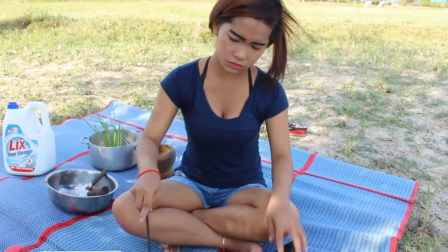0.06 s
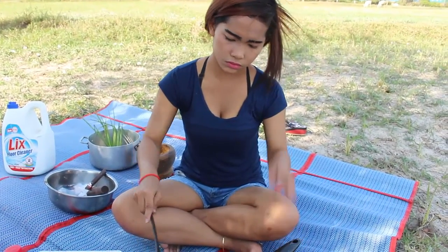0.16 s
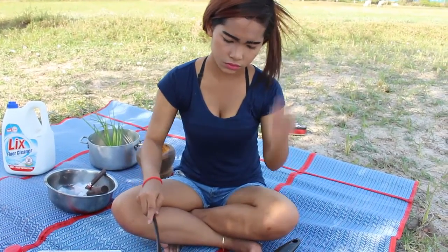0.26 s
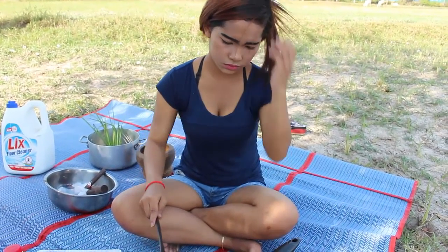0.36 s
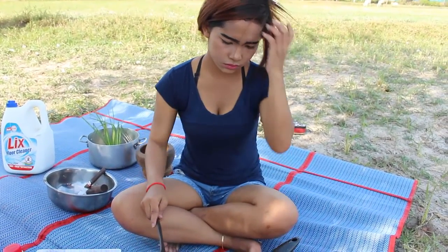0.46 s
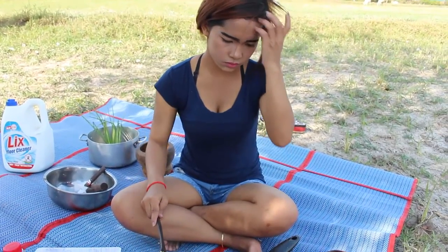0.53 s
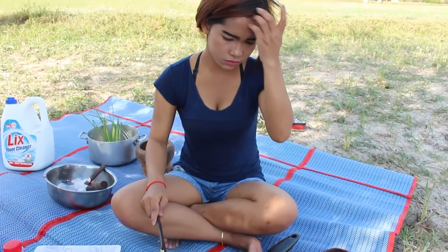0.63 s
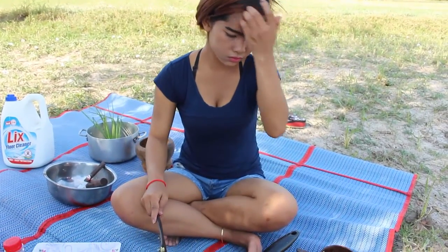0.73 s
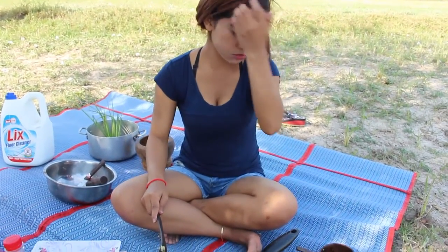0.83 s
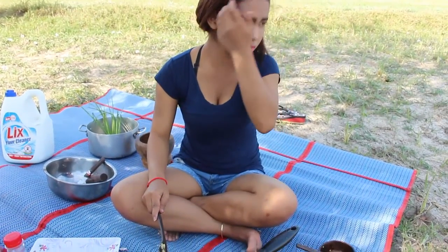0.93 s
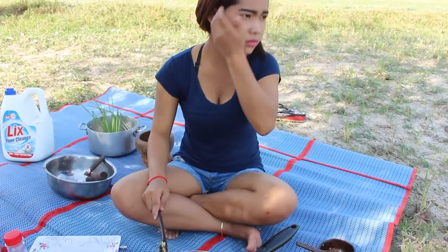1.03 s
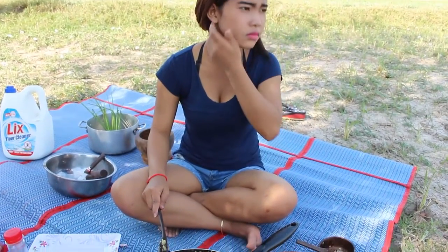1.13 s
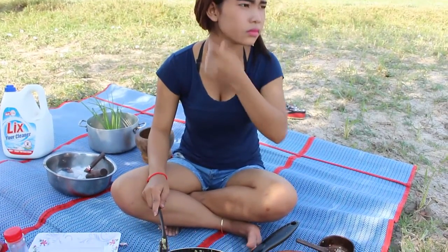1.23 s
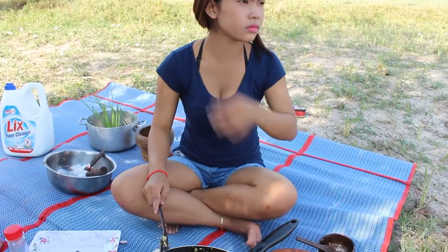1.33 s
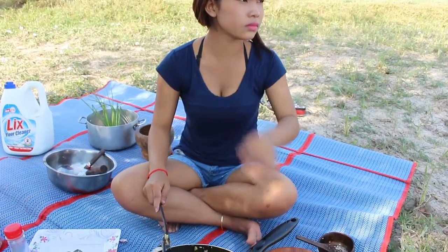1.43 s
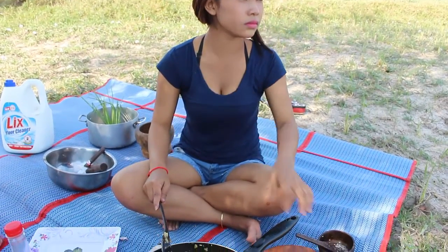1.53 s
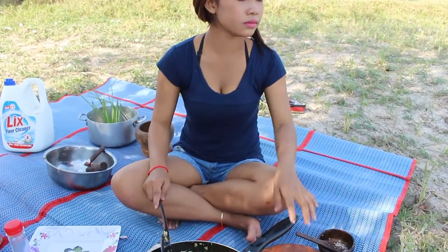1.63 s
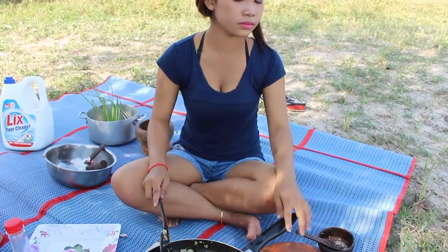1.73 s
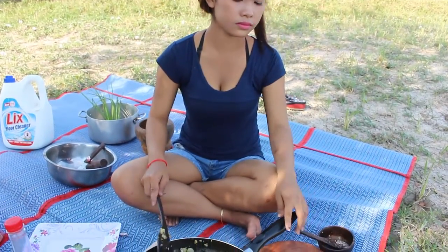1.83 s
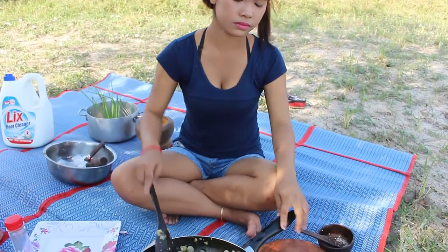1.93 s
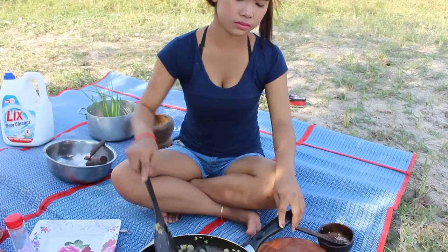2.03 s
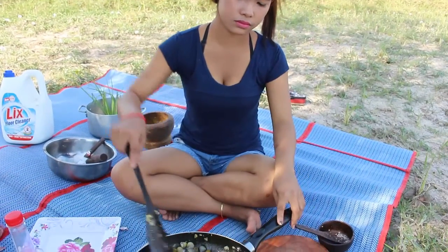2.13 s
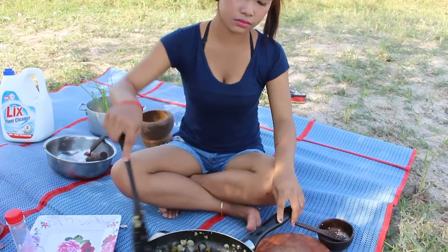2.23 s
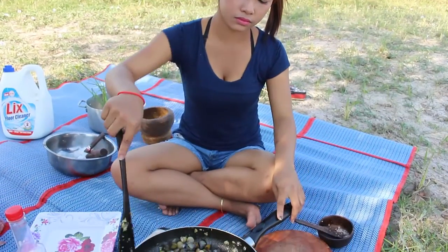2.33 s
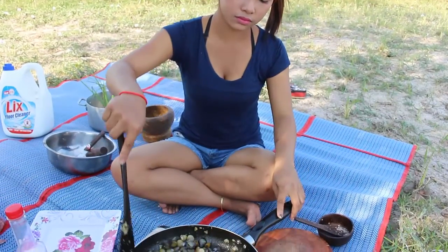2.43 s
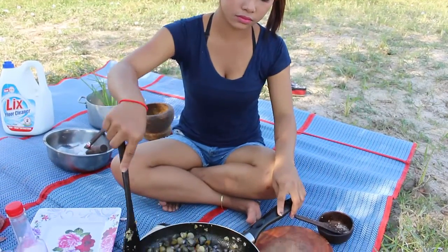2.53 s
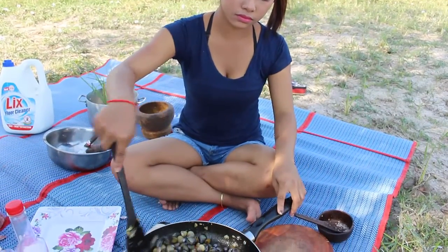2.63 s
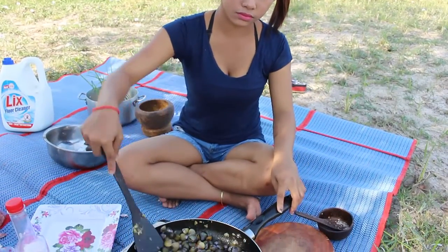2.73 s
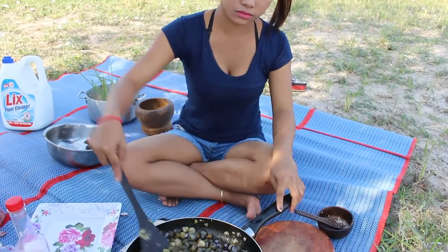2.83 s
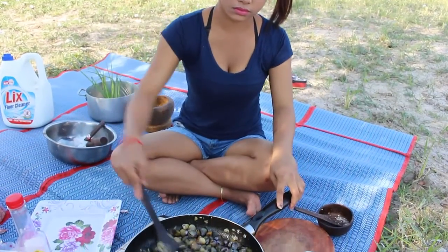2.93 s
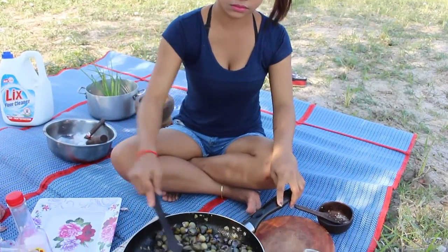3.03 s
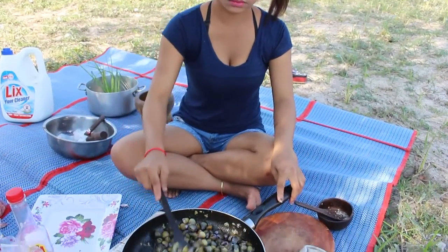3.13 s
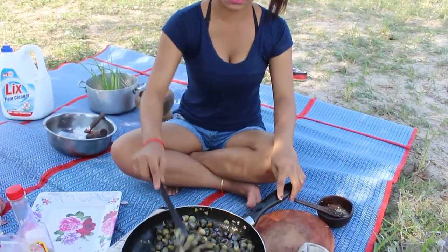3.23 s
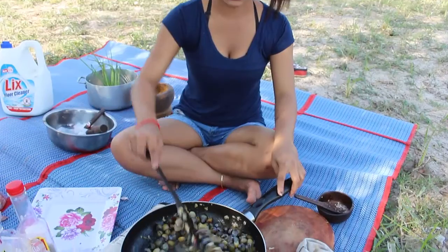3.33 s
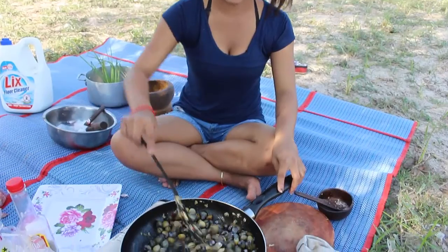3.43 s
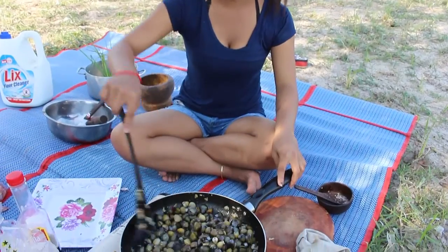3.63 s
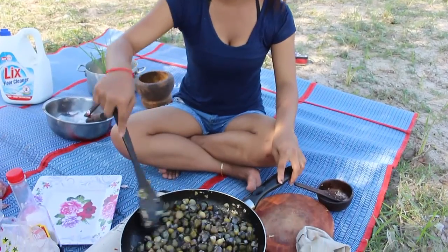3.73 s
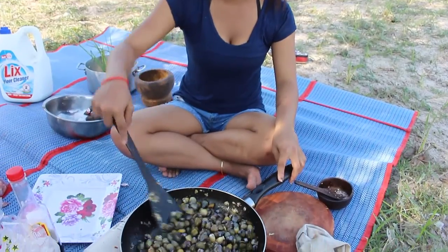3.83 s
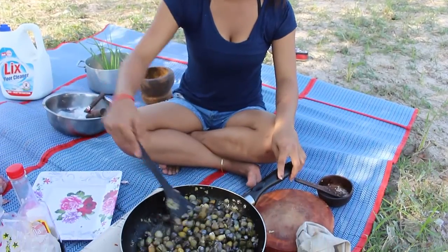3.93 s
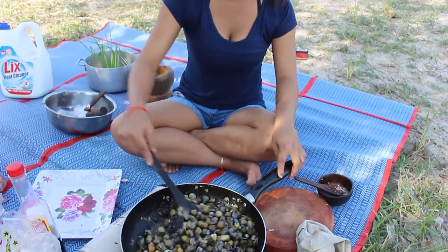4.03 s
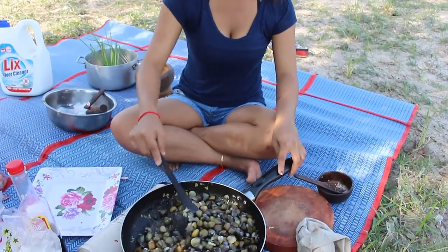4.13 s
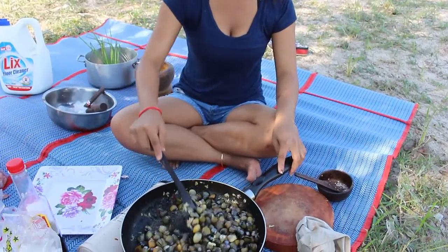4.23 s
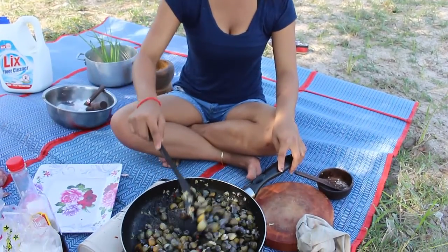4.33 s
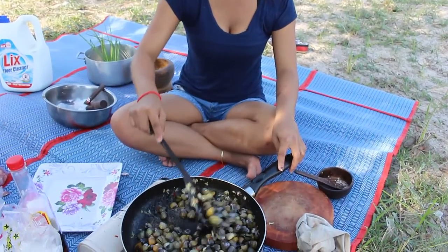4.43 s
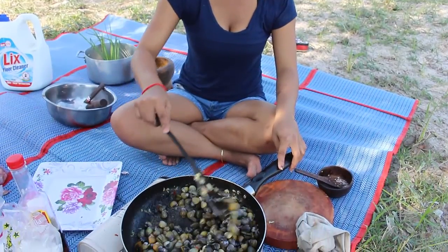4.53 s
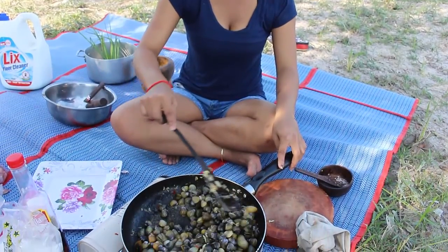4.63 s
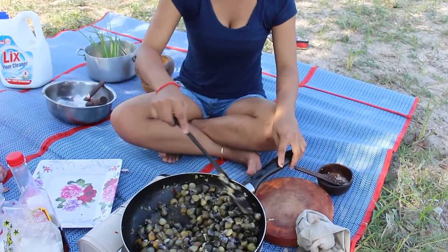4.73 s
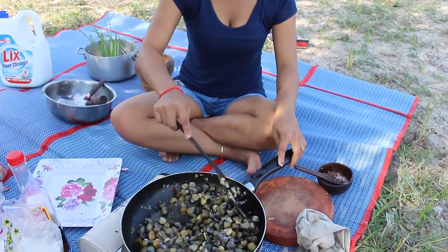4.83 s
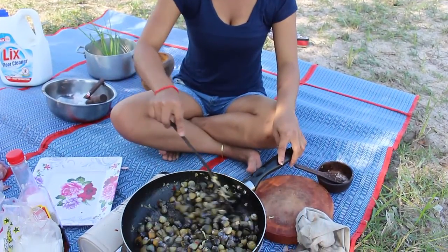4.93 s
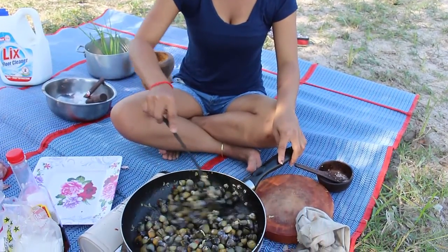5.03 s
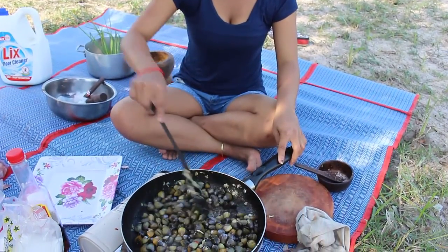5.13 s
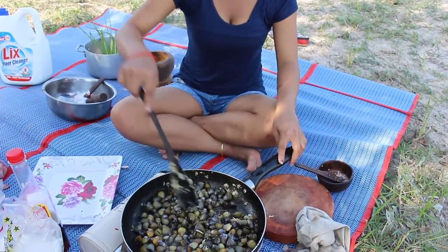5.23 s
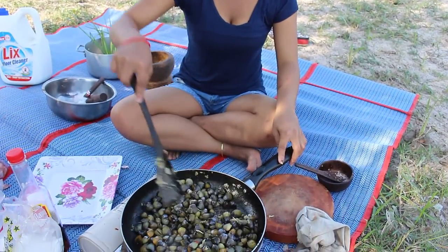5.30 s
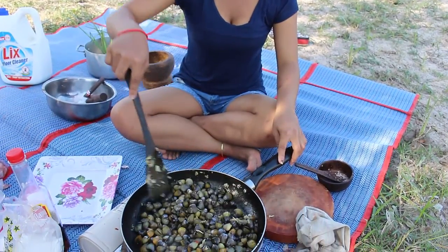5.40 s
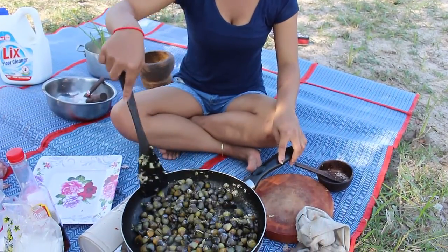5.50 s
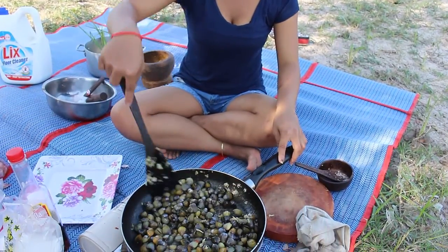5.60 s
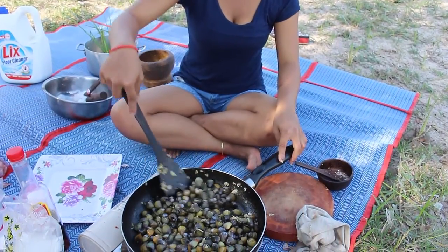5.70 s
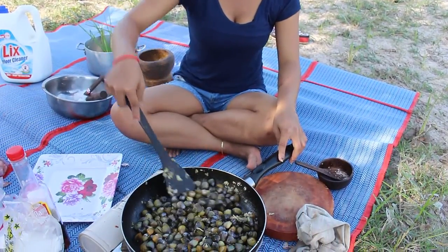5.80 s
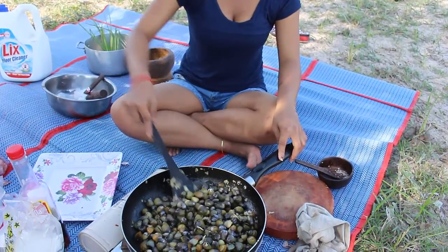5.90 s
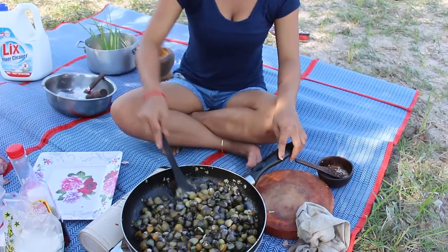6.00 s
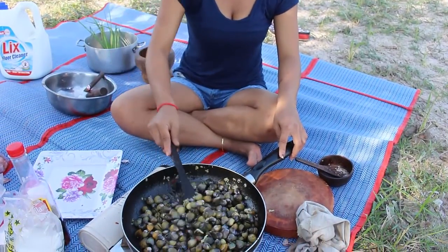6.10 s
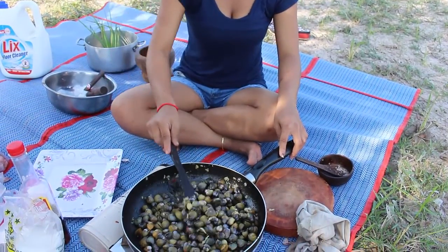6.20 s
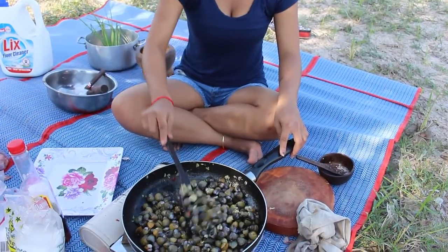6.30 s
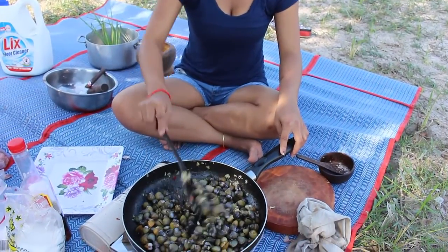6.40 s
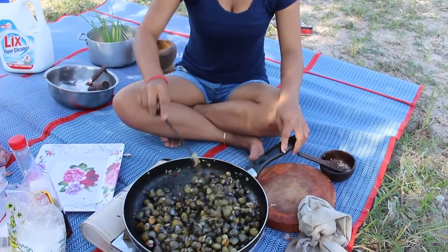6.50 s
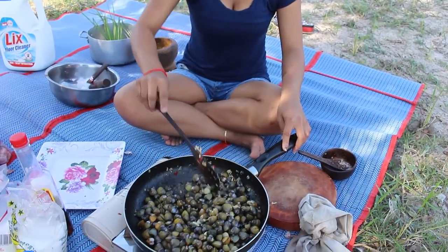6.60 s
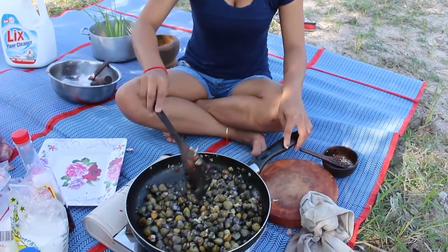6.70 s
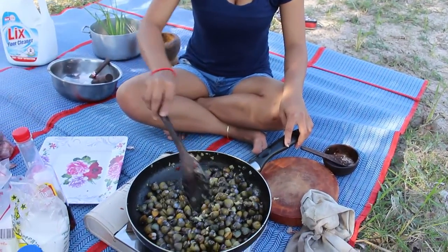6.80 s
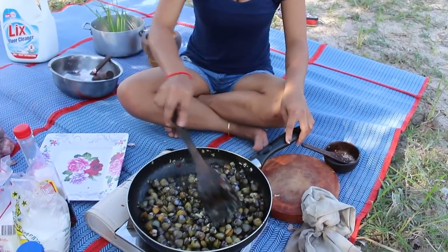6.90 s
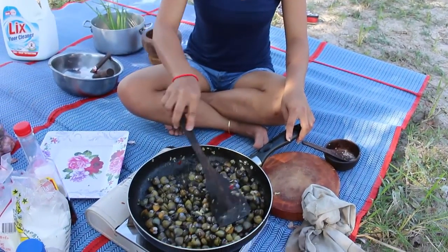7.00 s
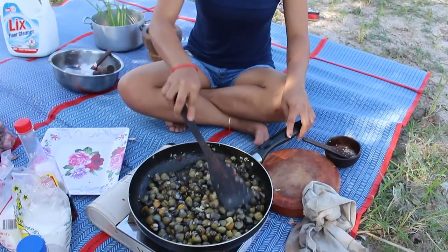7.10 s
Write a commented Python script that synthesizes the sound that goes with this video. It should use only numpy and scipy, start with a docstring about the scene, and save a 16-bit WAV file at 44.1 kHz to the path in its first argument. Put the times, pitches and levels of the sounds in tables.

```python
"""Shellfish frying in an open field

Close to a wide pan, a little left of the microphone, fat and juice hiss and spit: coloured noise and short rings.
A spatula knocks and scrapes the pan's ringing modes; shells drop back as thuds, clacks and notes, and tumble
as clumps of tiny clicks. The stand thumps softly, low noise makes the wind, and a gliding sine is a far bird.
"""
import sys
import numpy as np
from scipy import signal
from scipy.fft import rfft, irfft
from scipy.io import wavfile

SR = 44100
rng = np.random.default_rng(int(sys.argv[2]) if len(sys.argv) > 2 else 0)


def dump_mix(stems):
    """Bounce the given channels to the path in sys.argv[1] as a 16-bit WAV at rate SR."""
    frames = np.atleast_2d(stems).T  # one column per channel
    limited = np.clip(frames, -1, 1)  # hard clip at full scale
    pcm = np.round(limited * 32767).astype(np.int16)
    wavfile.write(sys.argv[1], SR, pcm)


N = 315315   # samples

# the frying bed, close by: (time [s], sizzle level [dB], gain of its treble [dB])
FRYING = [(0.0, -44, -5.5), (2.39, -42.5, -5.5), (2.81, -40.5, -5), (5.1, -42.5, -15), (5.2, -44, -2),
          (7.15, -42.5, -6.5)]
# louder spits of fat: (time [s], level [dB], pitch [Hz])
SPITS = [(0.229, -40, 2700), (0.242, -37, 2630), (0.252, -41, 2700), (0.258, -36, 2720), (0.265, -34, 2620),
         (0.9117, -30, 2520), (0.971, -37, 3500), (1.0062, -32, 4270), (1.037, -34, 3400),
         (1.075, -38, 3200), (1.108, -39, 2700), (1.645, -36, 2320), (1.96, -36, 4100), (2.194, -35, 3150)]
# relative spectrum of the frying: (frequency [Hz], level per Hz [dB])
SIZZLE_SPECTRUM = [(180, -56), (300, -10.5), (444, -11), (541, -2), (850, -8.5), (1080, -2), (1500, -5),
                   (2000, -4.5), (2600, -1.5), (3400, -0.5), (5000, -5), (12700, -15.5), (15000, -34)]
TREBLE_HZ = 6700
SPIT_CYCLES = 24.0   # cycles of the main note in which a spit falls 60 dB
SPIT_OVERTONE, SPIT_OVERTONE_DB = 1.33, 0   # pitch ratio and level over the main note


def sizzle():
    """Bursting steam bubbles: a dense hiss, a crackle of single pops, and the louder spits."""
    fry_db, treble_db = in_time(FRYING)
    hiss = rms_one(widen(*rng.standard_normal((2, N)))) * from_db(1.0 * drift(25.0))
    pops_per_s = 2500 * from_db(1.9 * drift(9.7))
    pops = rms_one(grains(pops_per_s, 2.9, 11.7, 916, 9570, scatter=0.74))
    bed = from_db(fry_db) * rms_one(colour(hiss + from_db(-4.5) * pops, SIZZLE_SPECTRUM))
    dull = signal.sosfilt(signal.butter(1, TREBLE_HZ, fs=SR, output="sos"), bed)
    sound = bed + (from_db(treble_db) - 1) * (bed - dull)
    for s, db, hz in SPITS:
        for ratio, extra_db in [(1, 0), (SPIT_OVERTONE, SPIT_OVERTONE_DB)]:
            sound = sound + ring(clicks_at([s], from_db(db + extra_db)), ratio * hz, SPIT_CYCLES / hz)
    return sound


# spatula edge on the pan: (time [s], level [dB], hardness [dB, per octave in the modes])
KNOCKS = [(0.393, -24, 1.5), (0.409, -31, -27), (2.491, -28.5, -13), (2.709, -35.5, 6.5),
          (3.7214, -14.5, -6), (4.82, -46.5, 10), (4.834, -22.5, -13), (5.5439, -21, 1), (5.554, -23, -1.5),
          (5.566, -30, -12)]
# modes of the pan, damped by the food: (frequency [Hz], relative level [dB], t60 [s])
PAN_MODES = [(430, 0.5, 0.02), (486.5, 5, 0.11), (590, 15.5, 0.034), (992, -28, 0.14), (1130, 14, 0.0096),
             (1250, -13.5, 0.12), (1607, 10, 0.041), (1923, 7, 0.046), (2085, 8.5, 0.054), (2240, 7, 0.048),
             (2767, 4.5, 0.021), (3500, 3, 0.031), (8060, -11, 0.017)]
PAN_CUT_HZ = 392   # small bodies radiate little below their first mode
EDGE_HZ, EDGE_T60_S = 2600, 0.002   # the click of the blade's edge
EDGE_DB, EDGE_FOLLOWS = 4, 1.5   # its level over the knock, and share of the knock's hardness


def pan(falls):
    """Knocks and falling shells drive the same modes, with new strengths for each knock."""
    s, db, hard_db = np.transpose(KNOCKS)
    luck_db = rng.normal(0, 2.5, (len(s), len(PAN_MODES)))
    knocks = 0
    for k, (hz, level_db, t60) in enumerate(PAN_MODES):
        # a harder knock favours the higher modes; neighbouring modes swing in opposite phase
        sign = (-1) ** k
        size = sign * from_db(db + level_db - 19.0 + luck_db[:, k] + hard_db * np.log2(hz / 500))
        fall_push = sign * from_db(level_db - 32.0) * falls
        knocks = knocks + ring(clicks_at(s, size) + fall_push, hz, t60)
    # the edge itself clicks and cracks: a few milliseconds of noise
    crack = burst(clicks_at(s, from_db(db - 1.5)), 0.0032, 1500, 5000)
    crack += ring(clicks_at(s, from_db(db + EDGE_DB + EDGE_FOLLOWS * hard_db)), EDGE_HZ, EDGE_T60_S)
    # and the food shakes for a moment after, duller
    crack += burst(clicks_at(s, from_db(db - 1.5)), 0.012, 320, 2600)
    return high_pass(knocks + crack, PAN_CUT_HZ)


# shells dropping on the metal: (time [s], thud level [dB], clack over thud [dB], own note [Hz])
DROPS = [(2.6965, -40, 15.5, 2060), (2.7635, -32, 2, 1880), (2.8625, -26, 1, 1770),
         (2.9304, -26.5, -3, 2840), (2.97, -22, 3, 4540), (2.9882, -29, 10, 5280),
         (3.041, -15.5, -16, 1580), (3.0825, -27, 1.5, 1710), (3.1292, -22, -1, 4260),
         (3.2773, -29, 9, 4760), (3.3174, -18, 3, 2100), (3.405, -17, 3.5, 3250), (3.4335, -25, -4, 1580),
         (3.47, -16, -1, 4930), (3.4843, -24.5, -6, 1550), (3.5625, -21, 3, 5000), (3.5884, -19, 8.5, 3700),
         (3.627, -23.5, -5, 3600), (3.6692, -33, 7.5, 4820), (3.769, -31, 12, 2280),
         (3.8125, -33, 17, 3600), (3.8387, -35.5, 16, 3140), (3.856, -28.5, 7, 5770), (3.877, -52, 6, 5920),
         (3.9268, -29, 2, 2000), (3.9494, -29.5, 10, 3400), (4.0168, -20, -23, 1400),
         (4.0313, -16, -13, 1940), (4.036, -25, -20, 1650), (4.0633, -22.5, -12, 1850),
         (4.0875, -24, -11, 1570), (4.0978, -23, -4, 1710), (4.1092, -22, 3.5, 1540),
         (4.186, -37, 13, 5960), (4.1939, -25, -4, 3000), (4.2329, -16, -13, 1460), (4.24, -17, 2, 1570),
         (4.2514, -16.5, -0.5, 3430), (4.2612, -28, 2, 3280), (4.3033, -24.5, -1, 2180),
         (4.3432, -23, -12, 2160), (4.3547, -14, -4, 2090), (4.3966, -27.5, 7, 2940),
         (4.4228, -25, 2, 4730), (4.4346, -25, -4, 2240), (4.52, -29, 10, 2710), (4.5354, -23.5, 0, 2020),
         (4.574, -18, 6, 2290), (4.6323, -40.5, 20.5, 6890), (4.6845, -38, 14, 8000),
         (4.7134, -33.5, 21, 7480), (4.766, -29, 8, 1960), (5.138, -26, 7, 1520), (5.5068, -49, 23.5, 4150),
         (5.7715, -33.5, 11, 1970), (5.893, -27, -2, 1430), (5.999, -29.5, 4, 2570),
         (6.0588, -26.5, 6.5, 2000), (6.088, -24.5, 0, 3200), (6.121, -16, 1, 2050), (6.1486, -15, 0, 2560),
         (6.2145, -23, 0, 4300), (6.222, -18.5, 4, 4360), (6.229, -22, -6, 3480), (6.243, -22, -20, 1730),
         (6.271, -26, -23, 1600), (6.2761, -19.5, -14, 1560), (6.2976, -26, 0, 2600),
         (6.305, -17.5, -14, 1600), (6.3096, -22.5, -1.5, 1470), (6.3354, -20.5, -4, 2140),
         (6.3645, -24, -1, 5010), (6.3952, -23, -4, 2060), (6.435, -26, -16, 2020), (6.444, -27, -16, 1490),
         (6.4753, -23.5, 4, 2000), (6.496, -24, -2, 2000), (6.5334, -23, 4, 2010), (6.6271, -27.5, 0, 3410),
         (6.662, -41, 15, 4070), (6.953, -33.5, 11, 7650), (7.038, -38, 18.5, 2480),
         (7.111, -31, 7.5, 2250)]
# a shell's clack: (frequency [Hz], t60 [s])
SHELL_MODES = [(2100, 0.0017), (2900, 0.0041), (4200, 0.0022)]
SHELL_CUT_HZ = 385
THUD_HZ, THUD_RISE_S = 1200, 0.00042   # middle pitch; the soft contact swells for about half a cycle
OWN_DB, OWN_FOLLOWS = -5.5, 0.54   # own note: level over the thud, and share of the clack's brightness
OWN_CYCLES = 30   # cycles in which the note falls 60 dB
TICK_DB, TICK_FOLLOWS = -7, 1   # rim's tick: level over the thud, and share of the clack's brightness
HEAVY_DB, TICK_LOSS = -25, 0.18   # heavier falls land on the body: dB of tick lost per dB of thud


def drops():
    """Each shell thuds softly, clacks, clacks again as it bounces and rings its own note; its rim ticks brightly."""
    s, db, clack_db, own_hz = np.transpose(DROPS)
    mode_luck = rng.normal(0, 1, (len(s), len(SHELL_MODES)))
    gap_luck = rng.normal(0, 1, len(s))
    pitch_luck = rng.normal(0, 1, (len(s), 1))
    bounce_s = s + 0.002 * from_db(5 * gap_luck)
    out = 0
    for k, (hz, t60) in enumerate(SHELL_MODES):
        size = -(-1) ** k * from_db(db + clack_db - 3 + 1.5 * mode_luck[:, k])
        second = clicks_at(bounce_s, size * from_db(-9))
        out = out + ring(clicks_at(s, size) - second, hz, t60)

    t = np.arange(SR // 40) / SR
    swell = t / THUD_RISE_S * np.exp(1 - t / THUD_RISE_S)
    thud_hz = THUD_HZ * from_db(1.1 * pitch_luck)
    thuds = from_db(db[:, None]) * swell * np.sin(2 * np.pi * thud_hz * t)
    own_db = db + OWN_DB + OWN_FOLLOWS * clack_db
    note_fade = from_db(own_db[:, None] - 60 * t * own_hz[:, None] / OWN_CYCLES)
    notes = note_fade * np.sin(2 * np.pi * own_hz[:, None] * t) * np.minimum(t / THUD_RISE_S, 1)
    places = np.round(s * SR).astype(int)[:, None] + np.arange(len(t))
    np.add.at(out, places, -thuds - notes)

    # a short rattle
    out += burst(clicks_at(s, from_db(db - 7.5)), 0.0048, 650, 3100)
    tick_db = db + TICK_DB + TICK_FOLLOWS * clack_db - TICK_LOSS * (db - HEAVY_DB)
    ticks = burst(clicks_at(s, from_db(tick_db)), 0.0023, 5100, 9470)
    # treble is placed less to the left than the thud
    shells = high_pass(out, SHELL_CUT_HZ) + ticks * from_db([[-.8], [.8]])
    return shells, clicks_at(s, from_db(db))


# the blade slides on the pan: (start [s], length [s], rasp level [dB], drone level [dB], drone pitch [Hz],
# share of slips locked to the mode [0-1])
SCRAPES = [(2.507, 0.15, -55, -53, 483, 0.15), (2.677, 0.018, -53, -40.5, 495, 0.37),
           (2.691, 0.045, -39, -46, 537, .3), (2.738, 0.17, -45.5, -49, 523, 0.35),
           (3.006, 0.054, -51, -41.5, 616, 0.42), (3.077, 0.21, -55, -49.5, 576, .3),
           (3.802, 0.05, -37.5, -33, 531, 0.43), (3.893, 0.37, -50.5, -49, 583, 0.38),
           (4.832, 0.14, -52.5, -47, 495, 0.38), (4.965, 0.21, -47, -50, 539, .2),
           (5.633, 0.11, -43, -40, 563, 0.6), (6.008, 0.32, -61, -49.5, 593, .3)]
SCRAPE_ATTACK_S, SCRAPE_RELEASE_S = 0.057, 0.065
SCRAPE_GROWTH_DB = -6   # a scrape weakens while it lasts
RASP_CUT_HZ, DRONE_T60_S = 1860, 0.024
DRONE_WAVER = 0.03   # share by which the drone's pitch wavers
RUMBLE_DB = -21   # the stand's shaking, relative to the drone's level


def sliding():
    """Chatter rasps in the upper modes and drones low, at a pitch set by the load; it shakes the stand."""
    s, length, rasp_db, drone_db, drone_hz, steady = np.transpose(SCRAPES)
    shape = SCRAPE_ATTACK_S, SCRAPE_RELEASE_S, SCRAPE_GROWTH_DB
    chatter = random_clicks(4000 * from_db(3.3 * drift(25)), 2.6)
    rasp = 0
    for k, (hz, db, t60) in enumerate(PAN_MODES):
        rasp = rasp + (-1) ** k * from_db(db - 2.8 * np.log2(hz / 500)) * ring(chatter, hz, t60)
    out = strokes(s, length, rasp_db, *shape) * rms_one(high_pass(rasp, RASP_CUT_HZ))
    warped_s = np.cumsum(1 + DRONE_WAVER * drift(24.0)) / SR
    for k, hz in enumerate(drone_hz):
        locked = np.sqrt(2) * np.sin(2 * np.pi * hz * warped_s)
        loose = rms_one(ring(chatter, hz, DRONE_T60_S))
        drone = steady[k] * locked + (1 - steady[k]) * loose
        out += strokes(s[[k]], length[[k]], drone_db[[k]], *shape) * drone
    rumble = rms_one(ring(rng.standard_normal(N), *STAND_MODES[1]))
    return out + from_db(RUMBLE_DB) * strokes(s, length, drone_db, *shape) * rumble


# heaps of shells shoved along: (start [s], length [s], whole shells' level [dB], shell rims' level [dB])
SHOVES = [(2.474, 0.08, -54, -53), (2.686, 0.018, -49, -39.5), (2.844, 0.044, -41, -46.5),
          (2.926, 0.12, -36.5, -45.5), (3.104, 0.27, -48, -48), (3.429, 0.063, -44, -36.5),
          (3.546, 0.014, -57, -47), (3.79, 0.1, -62, -39), (3.887, 0.22, -38, -47),
          (4.417, 0.18, -43.5, -43), (4.631, 0.12, -44.5, -44), (4.834, 0.12, -43, -48.5),
          (5.011, 0.14, -37.5, -42.5), (5.173, 0.037, -40, -53), (5.626, 0.17, -41.5, -44),
          (5.79, 0.29, -42, -48), (6.02, 0.25, -44.5, -56), (6.4, 0.22, -43.5, -42),
          (6.753, 0.41, -52, -70), (6.99, 0.13, -42.5, -51.5)]
# relative spectrum given to the tumbling shells: (frequency [Hz], level per Hz [dB])
TUMBLE_SPECTRUM = [(290, -35), (500, 8.5), (839, -4.5), (1150, 5), (1600, 3.5), (2200, 3.5), (3000, -0.5),
                   (4200, -5), (7700, -4), (13200, -18.5), (15500, -18)]
SHOVE_ATTACK_S, SHOVE_RELEASE_S = 0.065, 0.12
WHOLE_GROWTH_DB, RIM_GROWTH_DB = 2.5, 3.5   # the heap swells as the blade gathers it


def tumble():
    """Shells pushed along rub and click on each other in clumps: dull for whole shells, bright for thin rims."""
    s, length, whole_db, rim_db = np.transpose(SHOVES)
    whole = grains(3000 * from_db(3.3 * drift(30)), 3.15, 14.4, 650, 5300, scatter=0.31)
    rim = grains(6000 * from_db(5.1 * drift(30)), 4.0, 33.0, 3930, 13330, scatter=0.64)
    whole = rms_one(colour(whole, TUMBLE_SPECTRUM))
    rim = rms_one(colour(rim, TUMBLE_SPECTRUM))
    whole = whole * strokes(s, length, whole_db, SHOVE_ATTACK_S, SHOVE_RELEASE_S, WHOLE_GROWTH_DB)
    rim = rim * strokes(s, length, rim_db, SHOVE_ATTACK_S, SHOVE_RELEASE_S, RIM_GROWTH_DB)
    # the rims sound from the far side of the pan, less to the left
    return whole + rim * from_db([[-.8], [.8]])


# the pan rocks on its stand: (time [s], level of the push [dB])
THUMPS = [(3.72, -39), (3.799, -29)]
# low modes of the stand: (frequency [Hz], t60 [s])
STAND_MODES = [(130, 0.064), (260, 0.018)]


def stand():
    """Soft low pushes set the stand's two modes ringing."""
    s, db = np.transpose(THUMPS)
    push = signal.lfilter([.05], [1, -.95], clicks_at(s, from_db(db)))
    return sum((-1) ** k * ring(push, hz, t60) for k, (hz, t60) in enumerate(STAND_MODES))


# relative spectrum of the wind over the open field: (frequency [Hz], level per Hz [dB])
WIND_SPECTRUM = [(12, -65), (20, -11.5), (85, 1), (135, -1.5), (188, -5), (246, -10), (347, -20.5),
                 (420, -30), (550, -60)]
WIND_DB = -50.5


def wind():
    """Lumpy low noise, partly shared and partly opposite on the two sides, gusting on each by itself."""
    shared, opposite = rng.standard_normal((2, N))
    # the deepest buffeting pushes the two sides in opposite ways
    shared = signal.sosfilt(signal.butter(2, 60, "high", fs=SR, output="sos"), shared)
    opposite = signal.sosfilt(signal.butter(1, 60, fs=SR, output="sos"), opposite) * from_db(-1)
    gusts = from_db([1.24 * drift(1.3), 2 * drift(3) - 3])   # left, right
    noise = (shared + opposite * [[1], [-1]]) * gusts
    return from_db(WIND_DB) * rms_one(colour(noise, WIND_SPECTRUM))


# far bird: (start [s], length [s], start pitch [Hz], end pitch [Hz], level before placing [dB])
CHIRPS = [(2.04, 0.102, 2630, 2540, -49)]


def bird():
    """A short falling whistle, far to the right: a sine that glides, swelling and fading."""
    out, t = np.zeros(N), np.arange(N) / SR
    for s, length, start_hz, end_hz, db in CHIRPS:
        u = np.clip((t - s) / length, 0, 1)
        cycles = np.cumsum(start_hz + (end_hz - start_hz) * u) / SR
        out += from_db(db) * np.sin(np.pi * u) * np.sin(2 * np.pi * cycles)
    return out * from_db([[-6], [3]])


def grains(per_s, uneven_db, cycles, low_hz, high_hz, scatter):
    """Random clicks dealt to short resonators over a range of pitches, each from its own spot in the pan."""
    clicks, dealt = random_clicks(per_s, uneven_db), rng.integers(0, 14, N)
    clicks = clicks * (1 + scatter * rng.uniform(-0.41, 1, N) * [[1], [-1]])
    out = 0
    for k, hz in enumerate(np.geomspace(low_hz, high_hz, 14)):
        # the gain rises with pitch so that every range gets the same energy per Hz
        # and wanders, so the colour keeps shifting
        own_clicks = clicks * (dealt == k) * from_db(2.4 * drift(5.3))
        out = out + hz * ring(own_clicks, hz, cycles / hz)
    return out


def strokes(start_s, length_s, db, attack_s, release_s, growth_db):
    """Gain of strokes: up 30 dB in the attack, growing (weakening if negative) in between, down 30 dB after."""
    t, power = np.arange(0, N + 64, 64) / SR, 0
    for s, length, level_db in zip(start_s, length_s, db):
        before = np.maximum(s - t, 0) / attack_s
        after = np.maximum(t - s - length, 0) / release_s
        growth = growth_db * (np.clip((t - s) / length, 0, 1) - .5)
        power = power + from_db(level_db + growth - 30 * (before + after)) ** 2
    return np.interp(np.arange(N) / SR, t, np.sqrt(power))


def burst(clicks, decay_s, low_hz, high_hz):
    """Each click starts a short dying band of noise."""
    fading = signal.lfilter([1], [1, -np.exp(-1 / (decay_s * SR))], clicks + 1e-18)
    band = signal.butter(2, [low_hz, high_hz], "band", fs=SR, output="sos")
    return signal.sosfilt(band, fading * rng.standard_normal(N))


def ring(clicks, hz, t60):
    """A unit click sets a sine ringing from about height 1, falling 60 dB in t60 seconds."""
    r, w = from_db(-60 / (t60 * SR)), 2 * np.pi * hz / SR
    return signal.lfilter([0, np.sin(w)], [1, -2 * r * np.cos(w), r * r], clicks + 1e-18)


def clicks_at(s, size):
    """A click train from times and sizes."""
    out = np.zeros(N)
    np.add.at(out, np.round(np.asarray(s) * SR).astype(int), size)
    return out


def random_clicks(per_s, uneven_db):
    """Clicks at random moments, most small, a few large."""
    sizes = from_db(uneven_db * np.minimum(rng.exponential(1, N), 5)) * rng.choice([-1, 1], N)
    return sizes * (rng.random(N) < per_s / SR)


def drift(rate):
    """Slow chance of spread 1, drawn every 40 samples; a higher rate wanders faster."""
    r = np.exp(-80 * np.pi * rate / SR)
    slow = signal.lfilter([1], [1, -2 * r, r * r], rng.standard_normal(N // 40 + 2002))[2000:]
    return np.interp(np.arange(N) / 40, np.arange(len(slow)), rms_one(slow))


def colour(x, spectrum):
    """Give a flat signal a spectrum with a minimum-phase filter, so nothing sounds early."""
    size = 2 ** 14
    hz = np.maximum(np.arange(size // 2 + 1) * SR / size, 1)
    cepstrum = irfft(at_hz(spectrum, hz) * np.log(10) / 20)
    cepstrum[1:size // 2] *= 2
    cepstrum[size // 2 + 1:] = 0
    impulse = irfft(np.exp(rfft(cepstrum)))
    return signal.fftconvolve(x, impulse[None], axes=1)[:, :N]


# likeness of the hiss at the microphone's two sides: (frequency [Hz], left-right likeness [0-1])
LIKENESS = [(60, 1), (180, 0.15), (550, 0.83), (1650, 1), (4970, 1), (15000, 0.46)]


def widen(mid, side):
    """Mix two unrelated signals into left and right with the likeness each frequency has."""
    hz = np.maximum(np.arange(N // 2 + 1) * SR / N, 1)
    alike = np.clip(at_hz(LIKENESS, hz), 0, 1)
    m, s = rfft(mid) * np.sqrt(1 + alike), rfft(side) * np.sqrt(1 - alike)
    return irfft(np.array([m + s, m - s]), N)


def high_pass(x, hz):
    """A steep bass cut."""
    return signal.sosfilt(signal.butter(4, hz, "high", fs=SR, output="sos"), x)


def from_db(db):
    """Decibels to gain."""
    return 10 ** (np.asarray(db) / 20)


def rms_one(x):
    """Scale to rms 1."""
    return x / np.sqrt(np.mean(x ** 2) + 1e-20)


def in_time(rows):
    """One value per sample for each column after the time."""
    s, *columns = np.transpose(rows)
    return [np.interp(np.arange(N) / SR, s, c) for c in columns]


def at_hz(points, hz):
    """Read a spectrum on a log axis."""
    point_hz, value = np.transpose(points)
    return np.interp(np.log(hz), np.log(point_hz), value)


# the pan sits left of the microphone; knocks, scrapes, dropping shells and stand further left:
# left over right for all, extra for those hits, and the right side's delay
LEFT_DB, HITS_LEFT_DB, RIGHT_LATE_S = 1.5, 3, 6e-6


def scene():
    """The pan's sounds placed left; wind and bird around them."""
    shells, falls = drops()
    hits = shells + pan(falls) + sliding() + stand()
    near = hits * from_db([[HITS_LEFT_DB / 2], [-HITS_LEFT_DB / 2]]) + sizzle() + tumble()
    near *= from_db([[LEFT_DB / 2], [-LEFT_DB / 2]])
    hz = np.arange(N // 2 + 1) * SR / N
    near[1] = irfft(rfft(near[1]) * np.exp(-2j * np.pi * hz * RIGHT_LATE_S), N)
    return near + wind() + bird()


CUTOFF_HZ = 16200   # 70 dB down from here up


def record(dry):
    """The top is cut steeply."""
    return signal.sosfilt(signal.cheby2(12, 70, CUTOFF_HZ, fs=SR, output="sos"), dry)


dry = scene()
out = record(dry)
dump_mix(out)
```